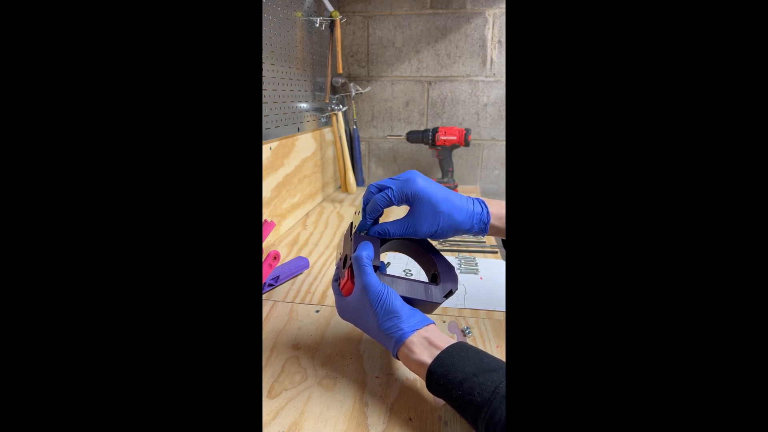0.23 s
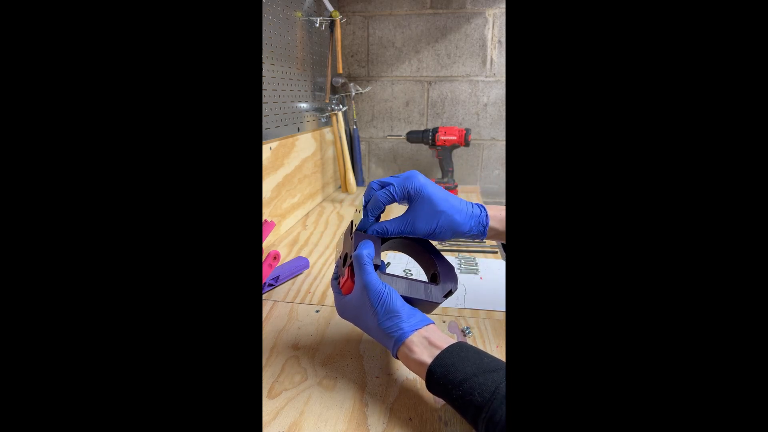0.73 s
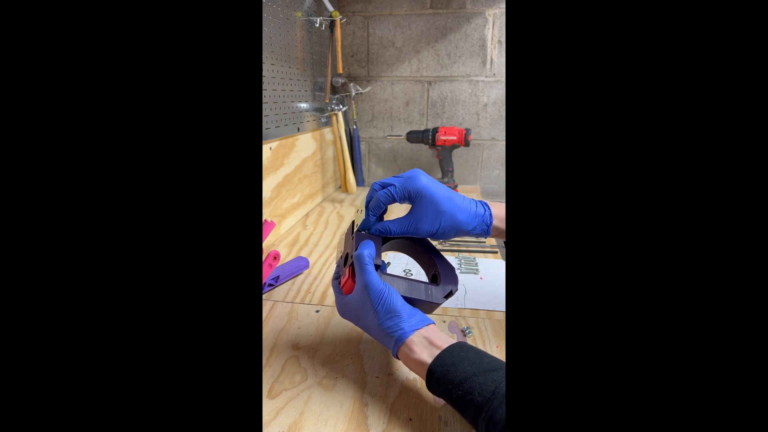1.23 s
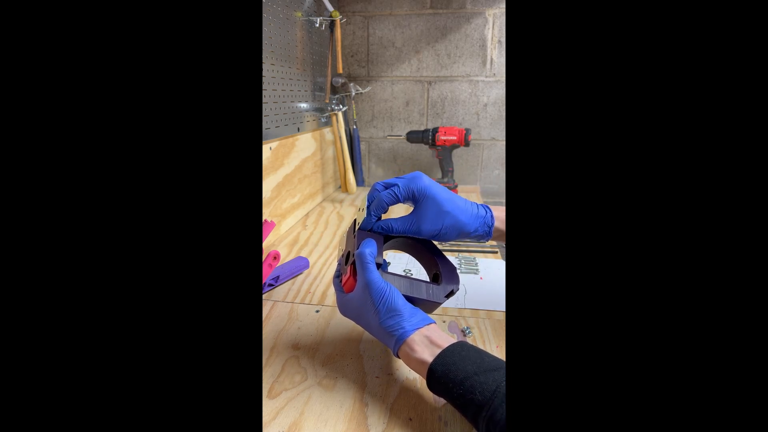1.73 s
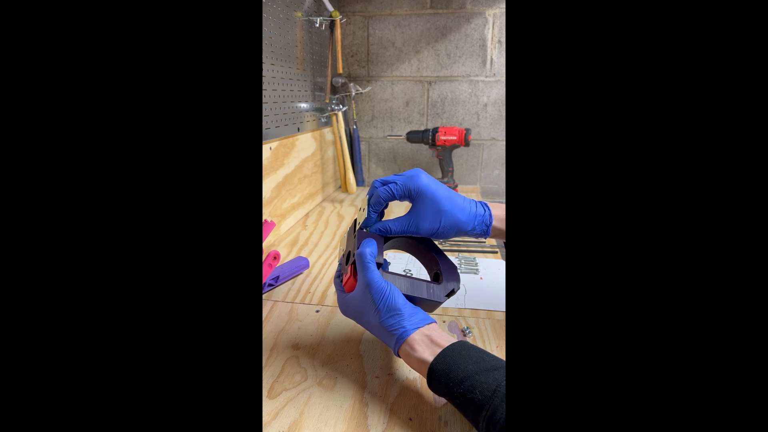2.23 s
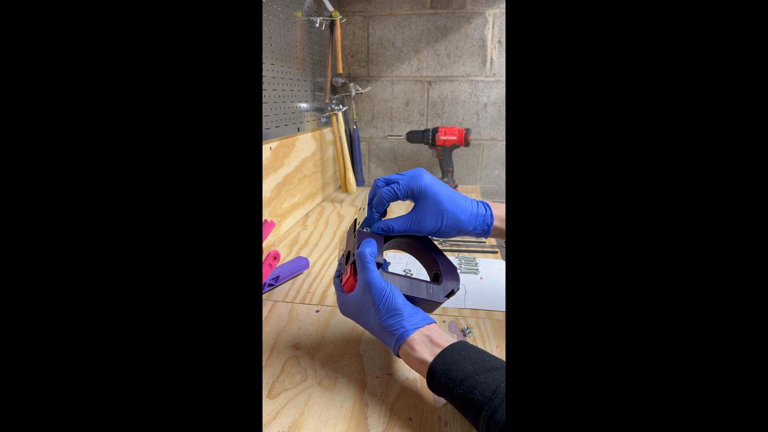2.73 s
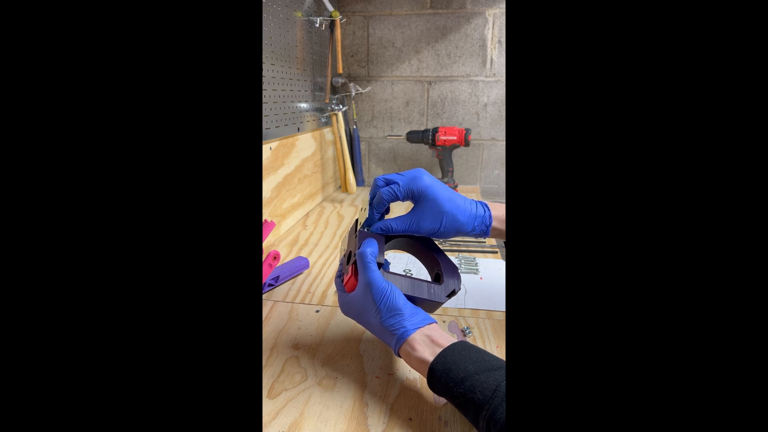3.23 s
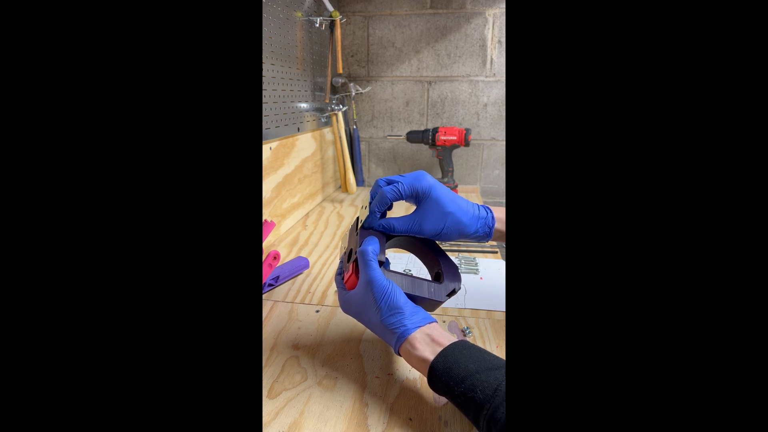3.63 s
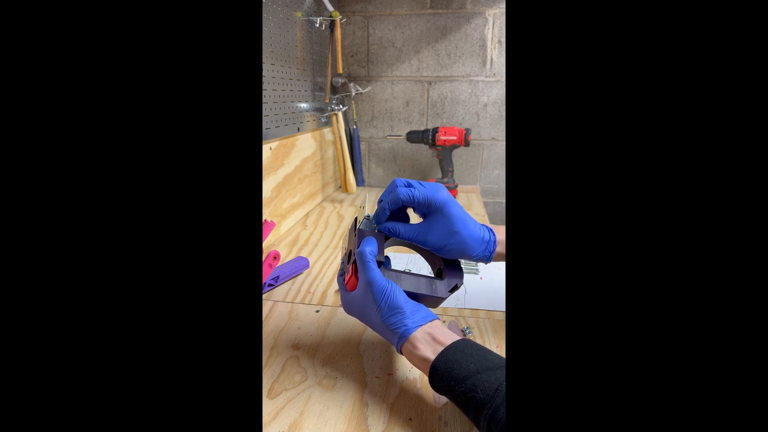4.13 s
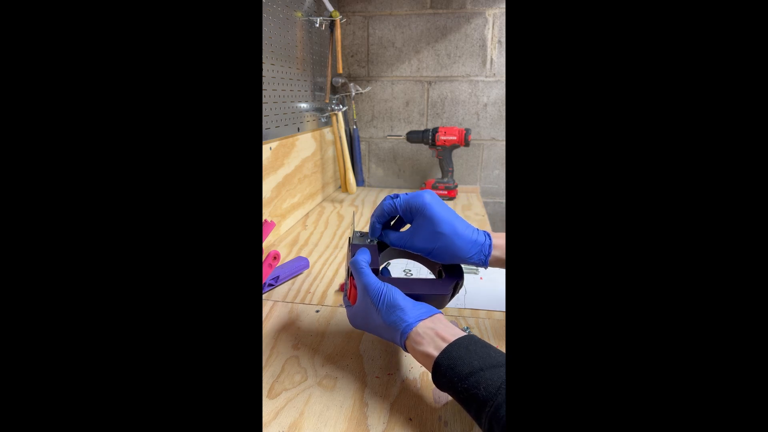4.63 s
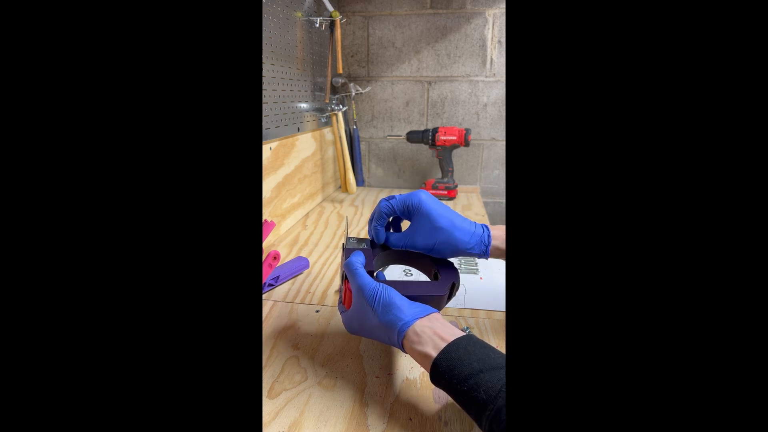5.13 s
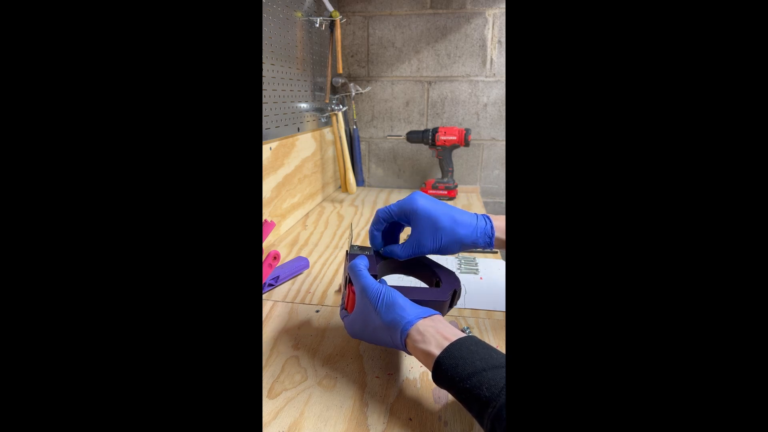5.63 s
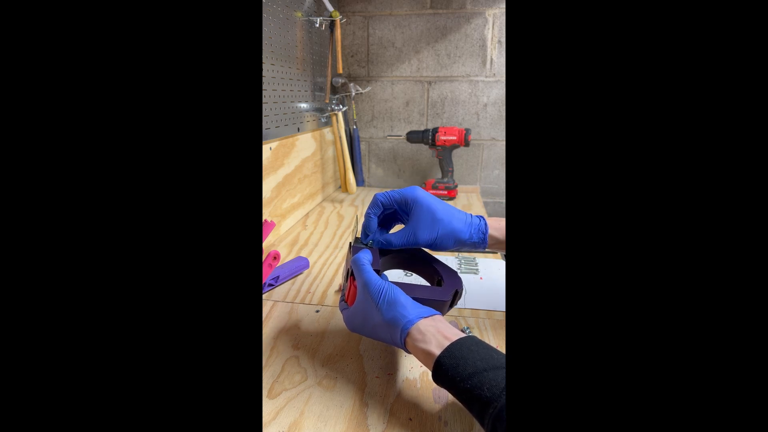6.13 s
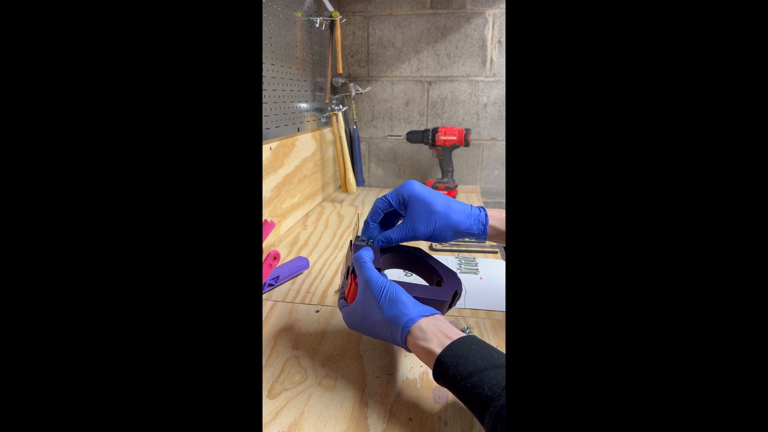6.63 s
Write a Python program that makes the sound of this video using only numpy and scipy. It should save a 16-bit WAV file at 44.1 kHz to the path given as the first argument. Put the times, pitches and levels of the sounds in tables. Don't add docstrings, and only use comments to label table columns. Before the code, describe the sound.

A close stereo pickup of hands at a wooden workbench in a small block-walled workshop. Throughout, low building rumble, mains hum, soft fan hiss and a steady thin mid-pitched whine continue, while distant machinery swells slightly. From 0 to 2.3 s, a small steel nut is started on a thread: scattered light ticks, dry clicks and faint grit, with brief rubber glove rubs. From about 2.4 s the clicks grow firmer, with a sharp one near 2.43, another at 2.9 and the loudest rattling cluster around 3.5. Quick ticks gather until 4.25. A second nut follows, with glove drag near 4.4, bright clinks around 4.7 and a small cluster at 5.1. Contacts then become sparse under softer rubbing; a tiny double squeak chirps at 5.8 to 6.0, a click falls at 6.2, and a last dull rub with a light tick ends near 6.85.

```python
import sys
import numpy as np
from scipy import signal
from scipy.fft import rfft, irfft
from scipy.io import wavfile
from scipy.ndimage import uniform_filter1d

SR = 44100
rng = np.random.default_rng(int(sys.argv[2]) if len(sys.argv) > 2 else 0)


def convert_level_to_amplitude(level_db):
    exponent = np.asarray(level_db, float) / 20
    return 10 ** exponent


def inscribe(sig):
    pcm = np.round(np.clip(np.atleast_2d(sig).T, -1, 1) * 32767)
    wavfile.write(sys.argv[1], SR, pcm.astype(np.int16))


N = 303095

# (frequency [Hz], level [dB], t60 [s])
PLASTIC_MODES = [(2200, 2, .06), (2620, -8, .025)]
BOLT_MODES = [(3500, 0, .045), (4250, -2, .03), (4900, -3, .025), (5400, -4, .025)]
NUT_LOW_MODES = [(6000, -2, .05), (6650, -2, .05), (7400, -4, .04), (8300, -2, .05), (8850, -5, .05),
                 (9230, -4, .045), (9900, -7, .03)]
NUT_HIGH_MODES = [(11400, -10, .025), (12350, 0, .03), (12950, -9, .028), (13960, -3, .026),
                  (14280, -6, .028), (15280, 2, .03), (15620, 1, .03)]

# (time [s], middle ring [dB],
# plastic knock [dB re ring], bright ring [dB re ring], loudest middle ring [Hz])
KNOCKS = [(0.224, -37, -12, 2.5, 7040), (0.57, -38, 4, -25.5, 7640), (0.788, -37, -22, -7.5, 7080),
          (0.9438, -37.5, -14, -11, 7000), (1.1681, -31.5, -60, -2.5, 6780),
          (1.321, -39, -22, -7, 7440), (1.3444, -33, -6.5, -7, 6430), (2.427, -25, -6, -8, 8940),
          (2.435, -26.5, -18, -24, 7200), (2.8990, -28.5, -7, -4, 7240),
          (3.3577, -36.5, -4.5, 4.5, 6960), (3.48, -21, -20, -4, 8410),
          (3.4963, -19, -26, -3.5, 6970), (3.7165, -40, 0, -6, 7470), (3.9086, -39.5, 6.5, -8, 7880),
          (4.4156, -40.5, -18, -6, 8200), (4.6941, -28, -30, 4, 7470), (4.717, -26, -34, 7, 7240),
                 (4.7474, -28.5, -34, 11, 8160), (4.767, -41, -5, 7, 7700), (5.105, -41.5, -3, 0.5, 7360),
                 (5.111, -40, -4.5, -6, 7460), (5.132, -30.5, -28.5, -1, 7630),
                 (5.148, -33.5, -9, -6.5, 7700), (5.162, -38, -13, -3, 7870),
                 (6.1845, -35.5, -27, 3.5, 7670), (5.417, -53.5, 14, -7, 8500),
                 (6.0098, -52, 0.5, 10, 7600)]
# (loudest bolt ring [Hz], loudest bright ring [Hz])
KNOCK_SPOTS = [(4260, 12800), (4830, 12460), (3510, 12910), (4220, 12760), (4210, 14210), (3490, 12490),
               (4190, 12490), (4770, 12320), (4490, 14190), (4800, 14060), (3530, 12170), (4230, 14190),
               (5510, 12300), (4260, 12930), (4220, 12480), (3400, 11300), (4250, 12370), (4260, 12380),
               (4240, 12370), (5330, 14300), (4070, 12400), (4250, 12900), (4290, 12310), (4840, 13910),
               (4380, 12920), (4960, 12910), (4230, 12900), (3490, 12700)]
KNOCK_BOLT_DB = [-4, 2.5, -8, 2, -12, -5, -4, -2, -23, -3, 10, -18, -13, 9, 11, -11, -14.5, -11.5, -20.5, 5,
                 5, -5, -14, -15, -13, 1, -2, 18.5]

# (time [s],
# middle ring [dB], bolt [dB re ring], bright ring [dB re ring])
TICKS = [(0.24, -39, -15, -1), (0.2863, -38.5, -3, -10), (0.4689, -39.5, -5, -13),
         (0.5248, -47.5, -3, 10), (0.5562, -45, -15, -18), (0.647, -44.5, 0, -5), (1.029, -53, 7, 4),
         (1.22, -41, -7, -5), (1.305, -49, 6, -18), (1.4362, -52.5, 7, -15), (1.519, -49.5, 6, 3),
         (1.7332, -45, 0, -13), (1.7803, -50, -15, 3), (2.0583, -45.5, -12, -21),
         (2.1192, -52, -12, -18), (2.183, -53, -22, -11), (2.2312, -46.5, -18, -27),
         (2.2524, -51, 4.5, -15),
         (2.386, -43.5, 5, -10), (2.6215, -39, -8, -8), (2.646, -41.5, -8, -19),
              (2.7458, -46, -9, -10), (2.995, -51, 0, -5), (3.183, -50, 2, -17), (3.1905, -38.5, 1.5, -10),
              (3.2747, -50, 10, -6), (3.29, -45.5, 8.5, -16), (3.344, -50, 20.5, 0), (3.468, -41.5, -5, -5),
              (3.627, -49.5, 5, -6), (3.78, -44.5, -7, -10), (3.9516, -38.5, 7.5, -5),
              (4.0408, -37.5, -4.5, -15), (4.174, -42, -7, -3), (4.184, -42, 7.5, -18),
              (4.2065, -43.5, 8, -2), (4.241, -39.5, 9, -22), (4.253, -41.5, -21, 0),
         (4.359, -44, 0, -11), (4.3676, -40.5, -11, -22), (4.4048, -40.5, -22, -5),
                (4.4893, -53, -3, -1), (4.5652, -56, 10, 0), (4.5781, -47.5, 2, -3),
                (4.6464, -52.5, 15.5, -10), (4.6549, -53.5, 3, 5.5), (4.838, -56, 6, -5.5),
                (4.9677, -54.5, 15, -4), (5.0236, -48, -7, 2), (5.3663, -48, -22, 0),
                (5.3878, -49.5, -12, 2), (5.415, -56, 10.5, -1), (5.55, -61, -1, 5.5),
                (5.5753, -51, -13, -7), (5.6571, -56.5, 6, 5), (5.714, -50, 2, 0), (5.8442, -56, -6, 5),
                (5.957, -54.5, 10, -9), (6.157, -53, 5, -8), (6.2169, -43, -8, -14.5),
                (6.839, -43.5, -15, -10)]
# (loudest middle ring [Hz], loudest bolt ring [Hz])
TICK_SPOTS = [(6440, 2920), (6520, 5530), (7020, 4240), (7020, 4980), (7730, 4780), (7920, 4820),
              (6470, 4240), (6970, 4270), (7860, 3070), (7200, 3480), (8660, 4130), (7340, 4240),
              (7530, 4300), (7250, 2810), (6460, 3040), (8440, 2890), (7550, 4460), (9450, 4810),
              (9410, 3080), (6990, 3050), (6990, 2860), (7000, 4230), (7360, 4890), (6610, 3330),
              (6980, 3110), (7660, 3290), (7530, 3540), (6820, 3540), (8370, 4250), (6630, 4840),
              (6900, 4500), (7690, 4250), (7920, 4350), (7960, 3570), (9080, 4230), (9090, 4470),
              (6470, 4230), (7660, 4310),
              (8440, 3450), (8150, 4240), (8410, 5020), (8770, 4840), (8100, 4240), (9390, 4150),
                (7210, 5420), (7030, 5430), (6430, 4260), (8990, 3520), (7080, 4870), (8520, 4910),
                (8630, 2810), (9590, 4230), (9430, 4840), (9590, 4670), (9590, 3800), (6600, 4390),
                (9590, 4940), (6310, 4180), (8070, 4810), (7880, 3510), (6680, 4890)]
# (time [s], middle ring [dB], loudest middle ring [Hz], loudest bolt ring [Hz])
GRIT = [(0.0349, -67, 7010, 4480), (0.1836, -63, 7000, 3110), (0.5163, -49, 7440, 4700),
        (0.639, -54, 8000, 4210), (0.7668, -65, 7380, 3100), (0.8625, -65, 7160, 3620),
        (0.9114, -64, 7200, 3620), (0.9274, -71, 7680, 3360), (1.0032, -62, 7260, 4510),
        (1.4841, -66, 7300, 4780), (1.531, -42, 7800, 4100), (1.6717, -62, 8550, 4190),
        (1.728, -56, 7300, 4220), (1.8147, -55, 9550, 4410), (1.8857, -70, 9030, 3290),
        (1.9491, -61, 7730, 4250), (2.0144, -67, 7600, 3640), (2.0344, -53.5, 6400, 4210),
        (2.207, -58, 7800, 3550), (2.6081, -54, 7010, 4300), (2.7398, -49, 6930, 3080),
        (2.9827, -55, 6970, 3100), (3.0585, -62, 9140, 5000), (3.1695, -55, 6700, 4220),
        (3.283, -48, 7660, 3500), (3.3185, -57, 8700, 4080), (3.4723, -40, 8440, 5390),
        (4.2982, -50.5, 7500, 3470), (4.6165, -58, 7880, 4250), (4.6235, -56, 9150, 4340),
        (4.9308, -56, 6680, 4290), (5.761, -56, 8600, 4450), (6.0986, -68, 8700, 3410),
        (6.4424, -73, 7800, 4660), (6.465, -66.5, 9500, 4720), (6.6519, -56.5, 7000, 5070)]
# (time [s], middle ring [dB], bolt [dB re ring], bright ring [dB re ring], loudest middle ring [Hz])
RATTLE = [(1.362, -46, -6, -1, 7800), (3.4285, -52.5, 3, -3.5, 7670), (3.4873, -25.5, -6.5, -6, 8460),
          (3.493, -28, -10, -3, 8200), (3.497, -25, -8.5, -2.5, 8800), (3.5017, -34.5, -4, 6, 6770),
          (3.5083, -34, -5.5, 1, 8950), (3.9147, -41, 4, -12, 7500), (4.727, -40.5, 3, 7.5, 8100),
          (5.0305, -49, 0, 2, 8470)]

# (time of full grip [s], closing [s],
# hold [s], bright rub [dB], dull rub [dB])
STROKES = [(0.0, .02, .01, -79, -86), (0.1, .1, 0.046, -80, -82), (0.18, 0.028, .01, -76, -76),
           (0.226, 0.011, 0.0083, -50.5, -68), (0.467, .03, 0.027, -63, -70),
           (0.567, 0.14, 0.0063, -53, -65), (0.794, .05, .01, -62, -71),
           (0.966, 0.15, 0.015, -62.5, -72), (1.167, 0.0088, 0.0063, -49.5, -68),
           (1.336, 0.038, 0.0097, -59, -47), (1.475, 0.026, .01, -62, -55),
           (1.524, 0.055, 0.0035, -53, -64), (1.673, 0.033, 0.024, -73, -70),
           (1.778, .03, 0.027, -65, -74), (1.903, .06, 0.034, -70, -56),
           (2.055, 0.027, .01, -62, -61), (2.117, .03, 0.017, -81, -74),
           (2.214, 0.036, 0.042, -66, -66), (2.415, 0.027, 0.085, -52.5, -54),
           (2.647, 0.097, 0.0077, -62, -50), (2.746, 0.073, 0.0086, -64, -49),
           (2.931, 0.048, 0.0089, -52, -51), (3.184, 0.01, 0.006, -53, -57),
           (3.353, 0.12, 0.21, -53, -62), (3.743, 0.23, 0.0088, -64, -52),
           (3.906, 0.012, 0.078, -47.5, -54), (4.05, 0.032, 0.0078, -51, -53),
           (4.123, .04, 0.021, -59, -60), (4.23, 0.11, 0.011, -53, -53),
           (4.39, 0.063, 0.035, -47, -64), (4.7, 0.18, 0.12, -54, -50),
                  (4.86, 0.27, 0.074, -65, -41), (4.95, .05, .05, -67, -49.5),
                  (5.041, 0.054, 0.12, -48, -48), (5.37, 0.042, 0.047, -55.5, -62),
                  (5.55, 0.041, 0.19, -65, -50.5), (5.799, 0.041, 0.092, -78, -53.5),
                  (6.02, 0.13, 0.0096, -72, -56), (6.19, 0.035, 0.0093, -53.5, -69),
                  (6.35, 0.063, 0.0085, -62, -76), (6.46, 0.029, 0.017, -79, -74.5),
                  (6.65, 0.092, 0.1, -64.5, -62), (6.839, 0.14, 0.046, -68, -44)]
# (frequency [Hz], density [dB per Hz])
DULL_RUB = [(1600, 22), (2200, 12.5), (2950, 0), (3400, 6), (4500, 10), (5500, 4.5), (7500, -66)]
BRIGHT_RUB = [(4500, 6.5), (6000, 12.5), (8000, 2), (10500, 12.5), (13000, -4), (15700, -4.5),
              (16500, -33.5)]

# (time [s], frequency [Hz], level [dB])
SQUEAK = [
    (5.75, 4750, -76),
    (5.79, 4780, -66),
    (5.835, 5050, -68),
    (5.865, 4800, -65),
    (5.9, 4750, -77),
    (5.94, 4830, -66),
    (5.965, 4800, -67),
    (5.985, 4660, -72),
    (6.01, 4640, -74),
]

# (frequency [Hz], density [dB per Hz])
RUMBLE = [(20, -31.5), (40, -12), (55, 2), (78, 1), (95, 0), (110, 2.5), (140, -6), (160, -8.5),
          (180, -19.5), (260, -64)]
FAN = [(650, -11), (800, -3.5), (950, 2), (1150, 1.5), (1450, -3), (1650, -8), (1850, -21), (2200, -18),
       (2600, -20.5), (3200, -30), (5000, -34.5), (8000, -76), (13000, -66.5), (15000, -71)]
FAR_COLOUR = [(150, -29), (220, 17.5), (270, 3.5), (340, 13.5), (500, 6.5), (700, 8), (850, -20.5)]
# (time [s], level [dB])
FAR = [(0., -63.5), (1.2, -58.5), (1.7, -57.5), (2.1, -61.5), (3.6, -57), (5.3, -56.5), (5.8, -55),
       (6.87, -62.5)]

# (frequency [Hz], level [dB rms], wander [dB])
TONES = [
    (59.8, -37.3, 1.2),
    (76, -47, 4.0),
    (119.6, -45.5, 1.5),
    (135, -52, 1.5),
    (108, -52, 3.0),
    (601, -64, 2.5),
    (820.6, -43, .8),
]
# (left-right [dB], right ahead [rad])
TONE_SIDES = [(0, .03), (0, .05), (.8, .15), (.8, .15), (.5, .1), (2.5, 1.3), (-10.5, 2.5)]
# (frequency [Hz], right ahead [rad], likeness [0-1], left-right [dB])
PORTS = [(20, 0, .999, 0), (100, .08, .995, .3), (180, .3, .93, .8), (400, 1.05, .6, -1.5),
         (700, 1.4, .45, .5), (900, .95, .95, -.3), (1400, .7, .97, 2.8), (1800, 0, .9, -1),
         (2750, -2.6, .7, 0), (4500, -1.5, .5, -.5), (5900, -3.1, .94, 0), (14900, -15.7, .94, 0),
         (15600, -16.6, .92, 0), (16300, -15.7, .92, 0)]
# (low edge [Hz], high edge [Hz], opens above [dB])
GATES = [(5750, 6350, -90), (6350, 6850, -93), (9800, 11000, -83), (13600, 14100, -85), (14100, 14500, -83),
         (14500, 15200, -79), (15200, 15800, -84), (15800, 17000, -74)]


def rms_one(x):
    return x / np.sqrt(np.mean(x ** 2) + 1e-20)


def coloured(x, spectrum):
    hz, level_db = np.transpose(spectrum)
    colour_db = np.interp(np.log(np.fft.rfftfreq(N, 1 / SR) + 1), np.log(hz), level_db)
    return rms_one(irfft(rfft(x) * convert_level_to_amplitude(colour_db), N))


def drift(rate_hz):
    r = np.exp(-80 * np.pi * rate_hz / SR)
    slow = signal.lfilter([1], [1, -2 * r, r * r], rng.standard_normal(N // 40 + 2002))[2000:]
    return np.interp(np.arange(N) / 40, np.arange(len(slow)), rms_one(slow))


def ringing(hz, t60, t, turn=0):
    return np.sin(2 * np.pi * (hz * t + turn)) * convert_level_to_amplitude(-60 * t / t60)


def contacts():
    hits = []
    knocks = zip(KNOCKS, KNOCK_SPOTS, KNOCK_BOLT_DB)
    for (s, db, knock, ring, hz), (bolt_hz, bright_hz), bolt in knocks:
        hits.append((s, db, knock, bolt, ring, hz, bolt_hz, bright_hz, 0.5))

    ticks = TICKS
    spots = TICK_SPOTS
    light = [(*tick, *spot) for tick, spot in zip(ticks, spots)]
    light += [(s, db, 0, -5, hz, bolt_hz) for s, db, hz, bolt_hz in GRIT]
    light += [(*row, 4250.) for row in RATTLE]
    bright = rng.choice([12350, 12900, 12900, 14100], len(light))
    for (s, db, bolt, ring, hz, bolt_hz), bright_hz in zip(light, bright):
        knock = min(2.0 * (-46.5 - db) - 10.5 + .3 * bolt, 3.0)
        hits.append((s, db, knock, bolt, ring, hz, bolt_hz, bright_hz, 0.46))
    return hits


def nuts():
    t = np.arange(round(.14 * SR)) / SR
    out = np.zeros((2, N + len(t)))
    hits = contacts()
    chance = rng.standard_normal((len(hits), 2, 22))
    cracks = rng.standard_normal((len(hits), 2, len(t)))
    bright = signal.butter(2, [2500, 15600], "band", fs=SR, output="sos")
    body = signal.butter(2, [2600, 5600], "band", fs=SR, output="sos")
    for hit, draws, noises in zip(hits, chance, cracks):
        s, peak_db, knock_db, bolt_db, ring_db, hz, bolt_hz, bright_hz, length = hit
        parts = [(PLASTIC_MODES, knock_db - .6), (BOLT_MODES, bolt_db - 17.0),
                 (NUT_LOW_MODES, -6.5), (NUT_HIGH_MODES, ring_db + 0.5)]
        modes = [(f, level_db + part_db, t60 * length)
                 for table, part_db in parts for f, level_db, t60 in table]
        modes += [(bolt_hz, bolt_db - 1.5, 0.075 * length), (bright_hz, ring_db - 3.0, 0.036 * length)]
        i = round(s * SR)
        light = np.clip((-37 - peak_db) / 5, 0, 1)
        rise_s = .0001 + .0006 * light
        for copy, draw, noise, turn in zip(out, draws, noises, (0, .25)):
            tick = convert_level_to_amplitude(7.0) * ringing(hz, 0.023 * length, t, turn)
            for (f, level_db, t60), d in zip(modes, draw):
                tick += convert_level_to_amplitude(level_db + 3 * (abs(d) - .8)) * ringing(f * (1 + .004 * d), t60, t, turn)
            tick *= np.sign(draw[-1]) * convert_level_to_amplitude(-2 * light)
            crack = noise * (convert_level_to_amplitude(-60 * t / .012) + convert_level_to_amplitude(-10 - 60 * t / (0.1 * length)))
            crack += convert_level_to_amplitude(0.5) * noise * convert_level_to_amplitude(-60 * t / 0.002)
            tick += convert_level_to_amplitude(-1.5 + .5 * ring_db) * signal.sosfilt(bright, crack)
            thud = noise[::-1] * convert_level_to_amplitude(-60 * t / (0.16 * length))
            tick += convert_level_to_amplitude(bolt_db - 4.5) * signal.sosfilt(body, thud)
            copy[i:i + len(t)] += convert_level_to_amplitude(peak_db + 2.5) * tick * (1 - np.exp(-t / rise_s))
    return out[:, :N]


def grip():
    t = np.arange(0, N + 64, 32) / SR
    fade_db_per_s = np.array([[234], [119]])
    resting_db = np.array([[-88.5], [-78]])
    wander = drift(4)[np.minimum(t * SR, N - 1).astype(int)]
    power = convert_level_to_amplitude(resting_db) ** 2 * convert_level_to_amplitude(5 * wander)
    for s, closing_s, hold_s, *top_db in STROKES:
        short_db = 24.5 * np.maximum(s - t, 0) / max(closing_s, .005)
        short_db = short_db + fade_db_per_s * np.maximum(t - s - hold_s, 0)
        power = power + convert_level_to_amplitude(np.array(top_db)[:, None] - np.minimum(short_db, 200)) ** 2
    return [np.interp(np.arange(N) / SR, t, 10 * np.log10(p)) for p in power]


def patchy(x, patch_db):
    edges = np.geomspace(1500, 16500, 11)
    out = np.zeros_like(x)
    for band in zip(edges, edges[1:]):
        sos = signal.butter(2, band, "band", fs=SR, output="sos")
        out += convert_level_to_amplitude(patch_db * drift(32.0)) * signal.sosfilt(sos, x)
    return out


def singing(x):
    out = x.copy()
    for hz, level_db, t60 in PLASTIC_MODES + BOLT_MODES + NUT_LOW_MODES[1:6] + NUT_HIGH_MODES[1:4]:
        held_t60 = t60 * min(1.1 * 3000 / hz, 1)
        r = convert_level_to_amplitude(-60 / (held_t60 * SR))
        poles = [1, -2 * r * np.cos(2 * np.pi * hz / SR), r * r]
        ring = signal.lfilter([(1 - r * r) / 2, 0, (r * r - 1) / 2], poles, x)
        out += convert_level_to_amplitude(6.5 + level_db + 3 * drift(14)) * ring
    return out


def gloves():
    bright_db, dull_db = grip()
    slipping = rng.random((2, N)) < 1200 * convert_level_to_amplitude(4.0 * drift(25)) / SR
    slip_db = 3.5 * np.minimum(rng.exponential(1, (2, N)), 4)
    slips = slipping * rng.standard_normal((2, N)) * convert_level_to_amplitude(slip_db)
    grain = 0.5 * rms_one(slips) + rng.standard_normal((2, N))
    rub = convert_level_to_amplitude(dull_db + 0.5) * coloured(grain, DULL_RUB)
    rub += convert_level_to_amplitude(bright_db + 7.0) * coloured(grain, BRIGHT_RUB)
    return convert_level_to_amplitude(1.0 * drift(33)) * singing(patchy(rub, patch_db=1.4))


def squeak():
    s, hz, level_db = np.transpose(SQUEAK)
    t = np.arange(N) / SR
    phase = 2 * np.pi * np.cumsum(np.interp(t, s, hz) + 60 * drift(90)) / SR
    height_db = np.interp(t, s, level_db, left=-120, right=-120) + 5 + 3 * drift(45)
    return convert_level_to_amplitude(height_db) * np.sin(phase)


def workshop(x):
    t = np.arange(round(.4 * SR)) / SR
    tail = rng.standard_normal((2, len(t))) * convert_level_to_amplitude(-60 * t / 0.079) * (t > .0006)
    tail /= np.sqrt(np.sum(tail ** 2, axis=1))[:, None]
    return convert_level_to_amplitude(-2.5) * signal.fftconvolve(x, tail, axes=1)[:, :N]


def air():
    far_db = np.interp(np.arange(N) / SR, *np.transpose(FAR)) + 2.5 * drift(3.5)
    copies = []
    for _ in range(2):
        rumble = convert_level_to_amplitude(-41.5) * coloured(rng.standard_normal(N), RUMBLE)
        far = convert_level_to_amplitude(far_db + 2.0) * coloured(rng.standard_normal(N), FAR_COLOUR)
        fan = convert_level_to_amplitude(-42 + .5 * drift(2.5)) * coloured(rng.standard_normal(N), FAN)
        copies.append(rumble + far + fan)
    return np.array(copies)


def tones():
    t, out = np.arange(N) / SR, np.zeros((2, N))
    for (hz, level_db, wander_db), (pan_db, ahead) in zip(TONES, TONE_SIDES):
        phase = 2 * np.pi * (hz * t + rng.random()) + 0.22 * drift(1.0)
        height = np.sqrt(2) * convert_level_to_amplitude(level_db + wander_db * drift(11.0))
        pan = convert_level_to_amplitude(pan_db * np.array([[.5], [-.5]]))
        out += height * pan * np.sin(phase + ahead * np.array([[-.5], [.5]]))
    return out


def ports(pair):
    hz, table = np.fft.rfftfreq(N, 1 / SR), np.transpose(PORTS)
    ahead, alike, pan_db = [np.interp(hz, table[0], column) for column in table[1:]]
    alike = np.clip(alike, 0, 1)
    same, other = rfft(pair) * np.sqrt([(1 + alike) / 2, (1 - alike) / 2])
    left = (same + other) * convert_level_to_amplitude(pan_db / 2) * np.exp(-.5j * ahead)
    right = (same - other) * convert_level_to_amplitude(-pan_db / 2) * np.exp(.5j * ahead)
    return irfft(np.array([left, right]), N)


def scene():
    ticks = nuts()
    return ports(ticks + workshop(ticks) + gloves() + squeak() + air()) + tones()


def roll_off(x):
    return signal.sosfilt(signal.butter(12, 16630, fs=SR, output="sos"), x)


def record(dry):
    hz, turn = np.fft.rfftfreq(N, 1 / SR), np.array([[1, 1], [1, -1]])
    out = turn @ dry / 2
    spectrum = rfft(out)
    for low_hz, high_hz, open_db in GATES:
        window = np.clip((hz - low_hz) / 200 + .5, 0, 1) - np.clip((hz - high_hz) / 200 + .5, 0, 1)
        band = irfft(spectrum * window, N)
        power = uniform_filter1d(band ** 2, 1500)
        faint = convert_level_to_amplitude(open_db + 2 * drift(6)) ** 2
        masked = convert_level_to_amplitude(-14 + 2 * drift(6)) ** 2 * power[::-1]
        shut = power < np.maximum(faint, masked)
        out = out - band * uniform_filter1d(shut * 1., 256)
    top_cut = signal.cheby2(16, 50, 16650, fs=SR, output="sos")
    return roll_off(signal.sosfilt(top_cut, turn @ out))


dry = scene()
out = record(dry)
inscribe(out)
```